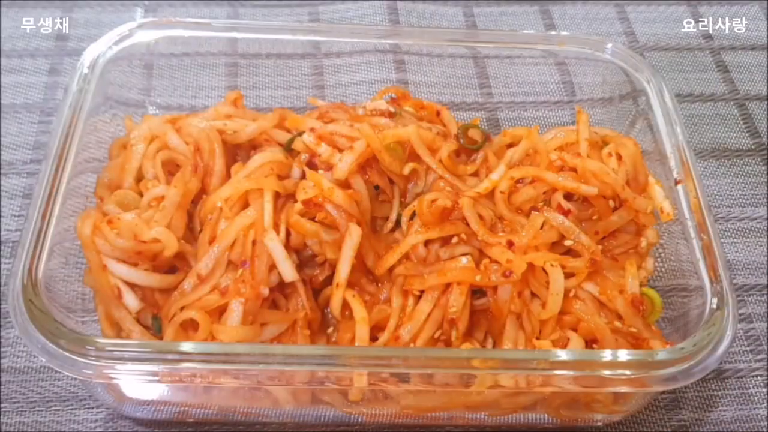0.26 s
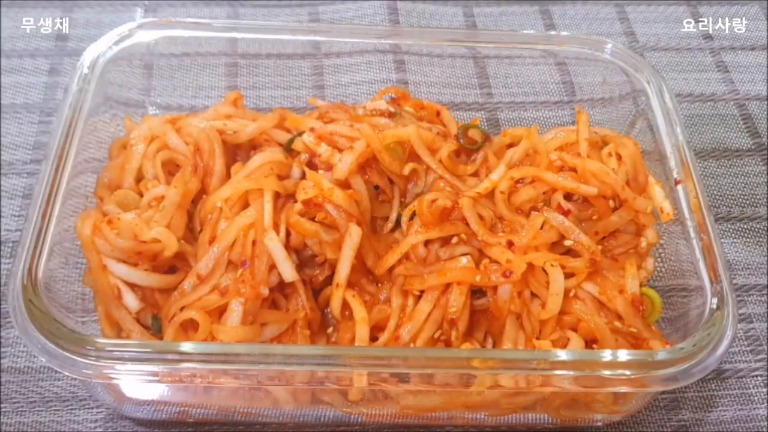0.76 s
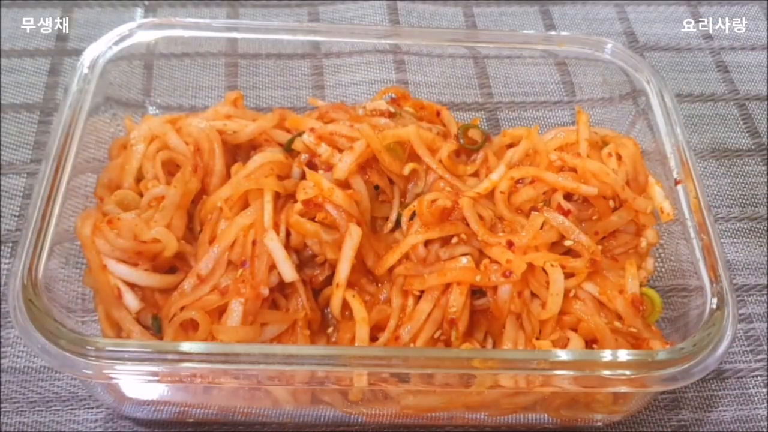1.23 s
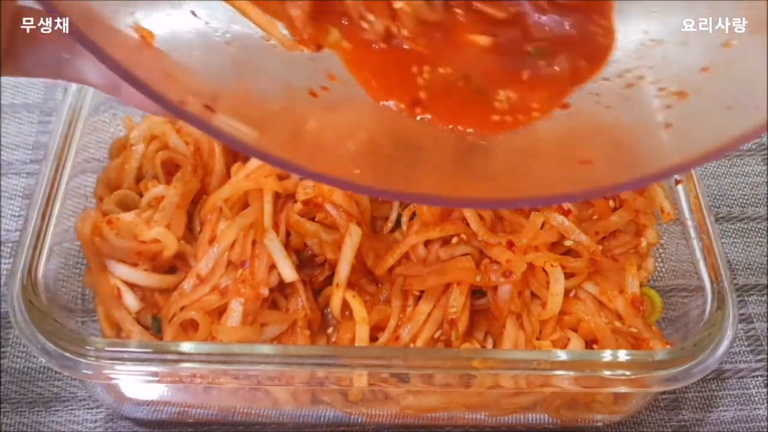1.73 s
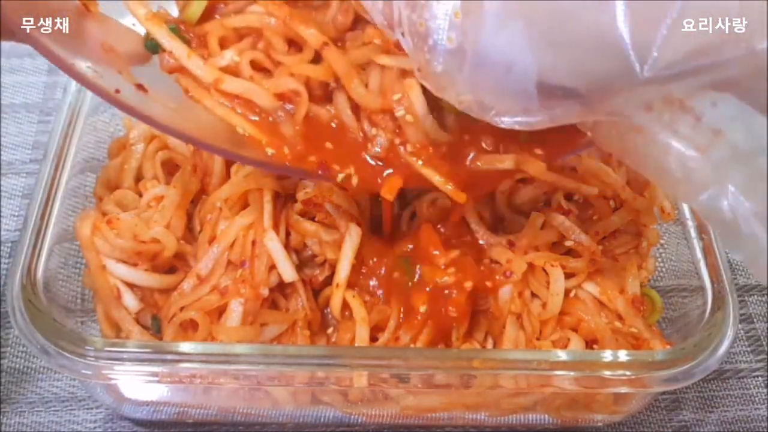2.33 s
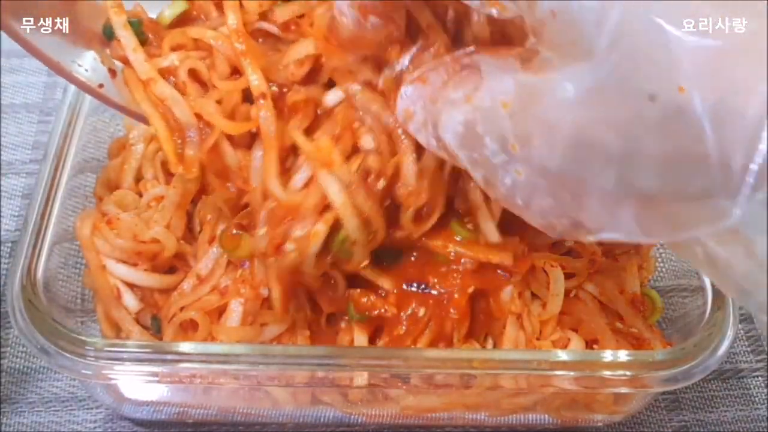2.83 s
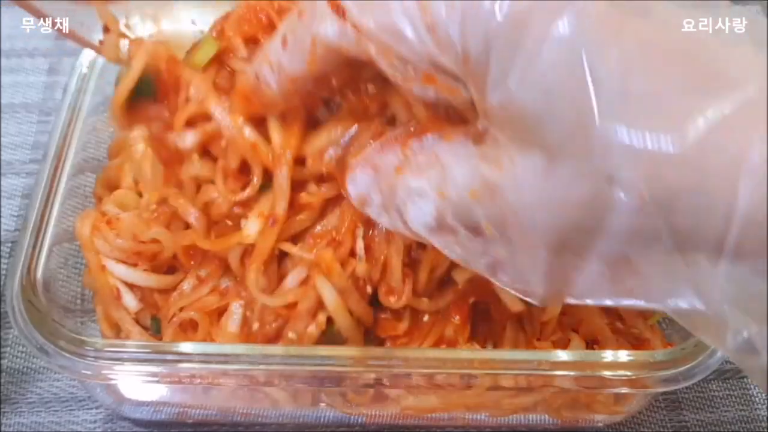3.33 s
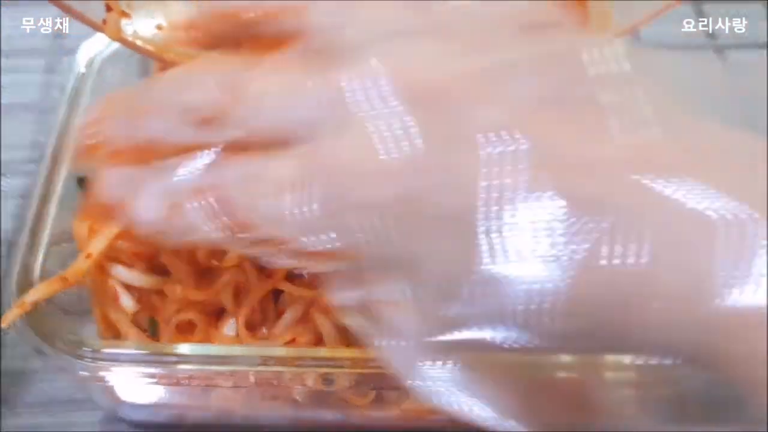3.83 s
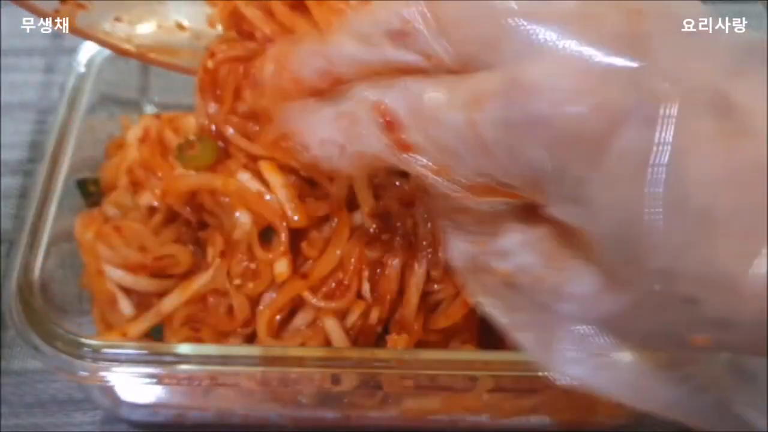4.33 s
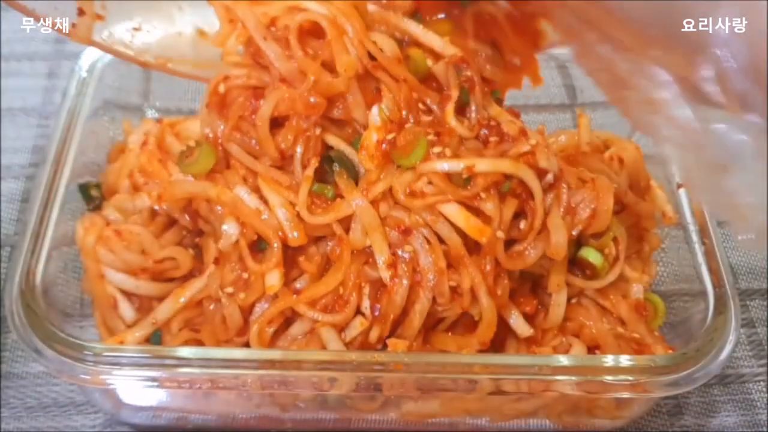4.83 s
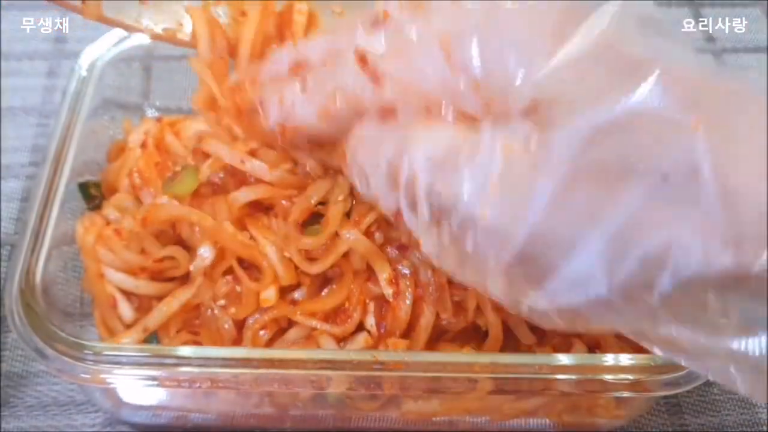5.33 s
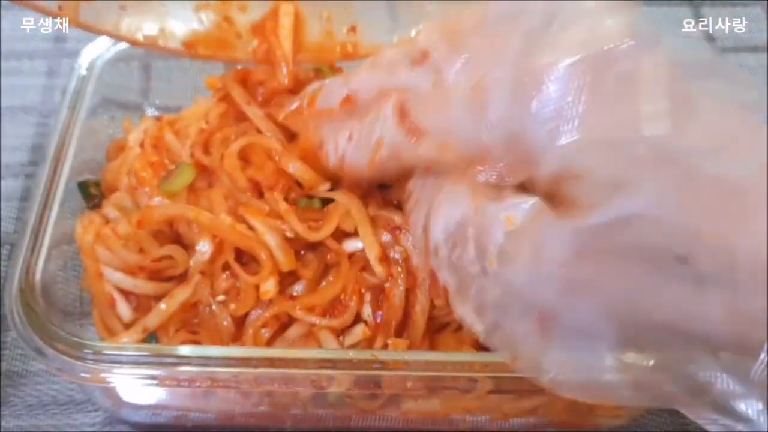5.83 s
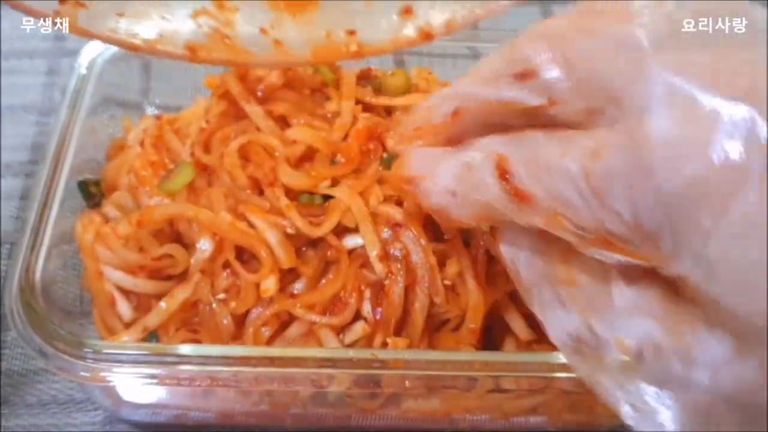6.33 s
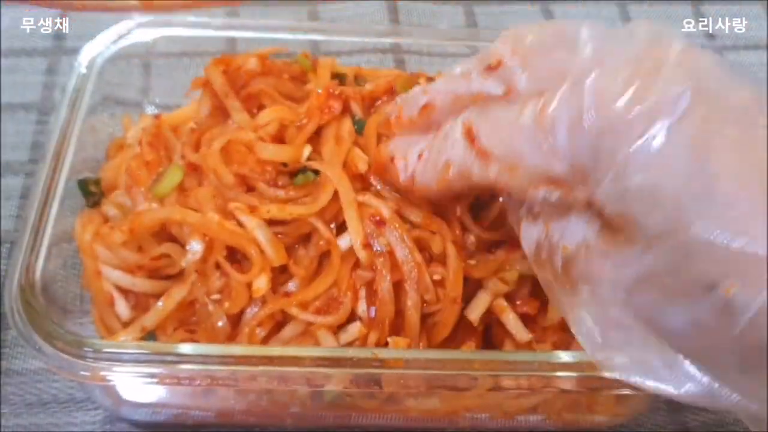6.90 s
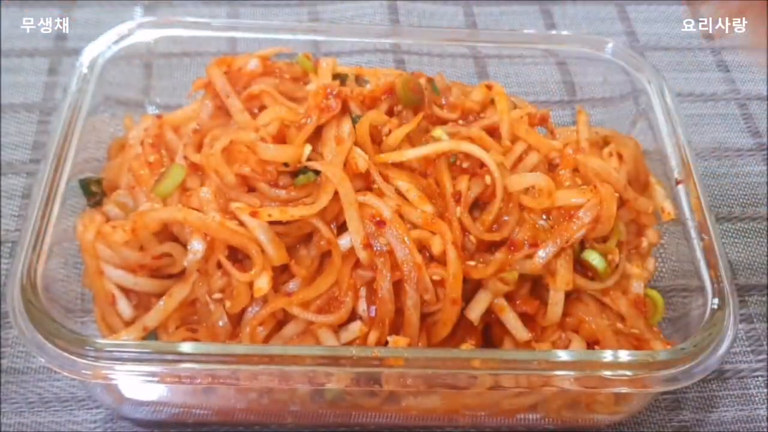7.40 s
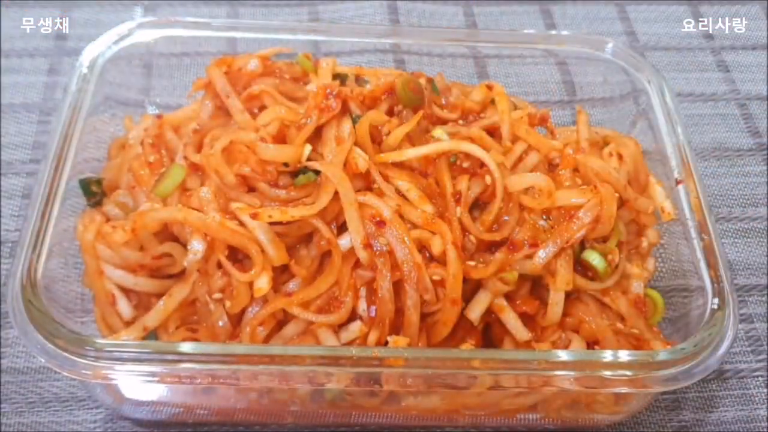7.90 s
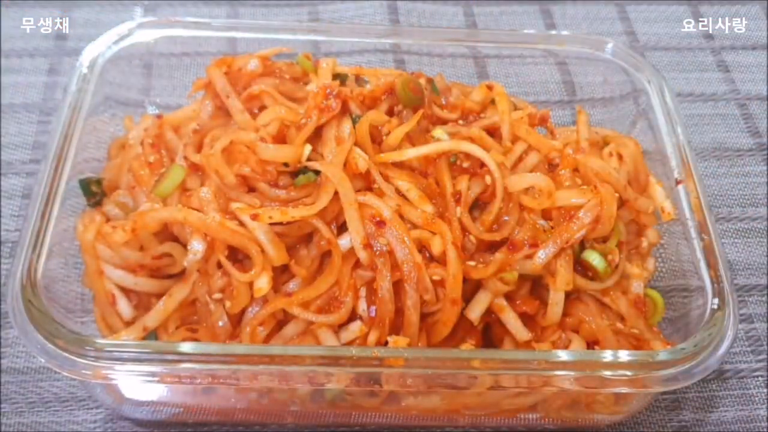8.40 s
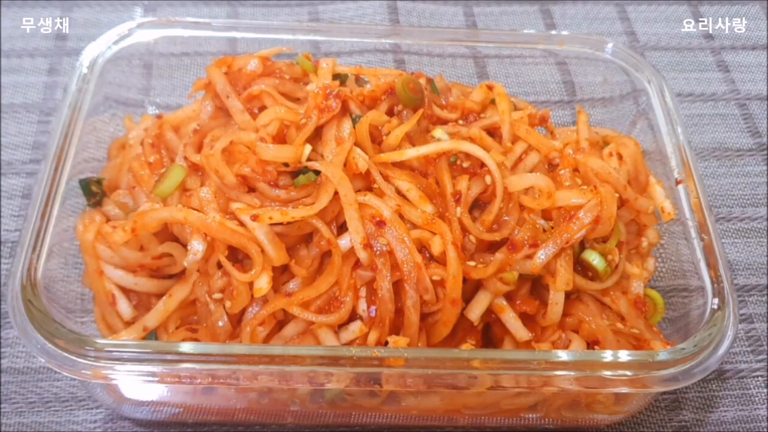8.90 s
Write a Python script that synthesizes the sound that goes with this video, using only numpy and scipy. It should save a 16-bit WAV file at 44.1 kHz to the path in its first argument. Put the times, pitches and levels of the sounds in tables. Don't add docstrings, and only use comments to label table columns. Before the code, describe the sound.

Close stereo pickup in a small hard-walled kitchen, with quiet fridge hum, airy fan hiss and faint far traffic rumble. From 0 to 1 s there are only faint dull scuffs and taps on a held bowl. From about 1 s thin plastic film starts to crackle in short bright snaps, with wet shreds sliding and muffled bowl taps around 2 to 3.3 s; one sharp snap stands out near 2.6 s. From 3.7 to 5.4 s the glove presses and crinkles densely, strongest near 4.8 s, with rising wet pops around 4.9 to 5.1 s. Sparser snaps continue to 6.7 s, with another squelch near 6 s, then small rustles to 7.6 s. The bowl hits the counter with loud hollow knocks at 7.95 and 8.08 s, settling faintly. A slight crinkle at 8.4 s and tiny pop at 8.7 s precede quiet room tone.

```python
import sys
import numpy as np
from scipy import signal
from scipy.io import wavfile

SR = 44100
rng = np.random.default_rng(int(sys.argv[2]) if len(sys.argv) > 2 else 0)


def boost(x):
    u = np.asarray(x, float) / 20
    return 10 ** u


def log_audio(samples):
    frames = np.atleast_2d(samples).T
    limited = np.clip(frames, -1, 1)
    pcm = np.round(limited * 32767).astype(np.int16)
    wavfile.write(sys.argv[1], SR, pcm)


N = 403756

# (time [s], peak level [dB], favoured mode [Hz])
TAPS = [(0.18, -64, 685), (0.712, -60, 660), (1.048, -62, 607), (1.21, -58, 611), (1.34, -67, 703),
        (1.918, -51.5, 400), (1.972, -58, 694), (2.146, -41.5, 795), (2.182, -64, 689), (2.216, -49, 540),
        (2.234, -50, 830), (2.31, -60, 802), (2.402, -57, 685), (2.489, -61, 680), (2.509, -58, 850),
        (2.583, -54, 840), (2.729, -60, 700), (2.797, -55, 720), (2.892, -59, 759), (2.953, -50.5, 584),
        (3.104, -53, 880), (3.308, -52.5, 850), (3.349, -57, 656), (3.825, -54.5, 790), (4.92, -58, 759),
        (6.199, -58, 786)]
EDGES = 22 * 2 ** np.arange(0, 9.6, .5)


def rms_one(x):
    return x / np.sqrt(np.mean(x ** 2) + 1e-20)


def in_time(rows):
    s, *columns = np.transpose(rows)
    return [np.interp(np.arange(N) / SR, s, c) for c in columns]


def at_hz(points, hz):
    table_hz, values = np.transpose(points)
    return np.interp(np.log(hz), np.log(table_hz), values)


def sides(pan_db):
    return boost(np.multiply.outer([.5, -.5], pan_db))


def pair(white, alike):
    alike = np.clip(alike, -1, 1)
    common = np.sqrt(1 + alike) * white[0]
    opposed = np.sqrt(1 - alike) * white[1] * [[1], [-1]]
    return (common + opposed) / np.sqrt(2)


def bands(size=N):
    white = rng.standard_normal((2, 2, size))
    for k, (low, high) in enumerate(zip(EDGES, EDGES[1:])):
        band = signal.butter(2, [low, high], "band", fs=SR, output="sos")
        yield np.sqrt(low * high), signal.sosfilt(band, white[k % 2])


def narrow(white, hz, width_hz):
    r = np.exp(-np.pi * width_hz / SR)
    stage = [1, 0, -1, 1, -2 * r * np.cos(2 * np.pi * hz / SR), r * r]
    return rms_one(signal.sosfilt([stage, stage], white))


def burst(powers, rise_s, fall_s):
    for tau in (rise_s, fall_s):
        decay = np.exp(-2 / (max(tau, 1e-4) * SR))
        powers = signal.lfilter([1], [1, -decay], powers + 1e-18)
    return np.sqrt(powers / (rise_s * SR / 2 + 1))


def swells(s, hold_s, db, rise_db, fall_db):
    clock = np.arange(0, N + 64, 64) / SR
    s, end = np.c_[s], np.c_[np.add(s, hold_s)]
    before, after = np.maximum(s - clock, 0), np.maximum(clock - end, 0)
    level = np.c_[db] - rise_db * before - fall_db * after
    return np.interp(np.arange(N) / SR, clock, boost(2 * level).sum(axis=0))


def hand():
    # (time [s], film crackle [dB], wet strands over crackle [dB])
    work = [(0, -85.5, 3), (.36, -83, 4.5), (.75, -70, 4), (1.25, -68.5, 2), (1.8, -71.5, 3.5),
            (2.3, -69.5, 2.5), (2.8, -67.5, 3.5), (3.3, -61, 0), (3.54, -72, 2), (4.0, -60, -2.5),
            (4.56, -91, -1), (5.0, -62, 1), (5.45, -67.5, -0.5), (6.08, -67.5, 2), (6.36, -83, 5),
            (6.77, -68, -2), (7.3, -82, 6.5), (9.15, -86.5, 2)]
    # (time [s], hold [s], crackle [dB], wet strands over crackle [dB])
    grabs = [(0.198, 0.019, -81, 11.5), (1.042, 0.023, -66.5, 3.5), (1.292, 0.014, -62, 1),
             (1.355, 0.036, -63, -2), (1.865, 0.043, -64, -6), (1.94, 0.038, -62, 1.5),
             (2.05, 0.0091, -65, 3.5), (2.425, 0.088, -63, 2.5), (2.583, 0.011, -57.5, -6),
             (2.89, .06, -64.5, -8), (3.101, 0.08, -53.5, -1), (3.443, .01, -61.5, -2),
             (3.675, 0.023, -58.5, -1), (3.826, 0.05, -59, 0.5), (4.085, 0.057, -60, -1),
             (4.243, 0.19, -62, -1.5), (4.47, 0.018, -56.5, -2.5), (4.6, 0.07, -59.5, 0.5),
             (4.705, 0.1, -55.5, 0), (4.858, 0.09, -56, -2), (5.048, 0.031, -59.5, -2),
             (5.632, 0.017, -58.5, -4), (5.72, 0.011, -63, -15), (5.952, 0.019, -59, -4.5),
             (6.2, .015, -60.5, -0.5), (6.291, 0.017, -62.5, 0), (6.412, 0.17, -58.5, -2.5),
             (7.037, .02, -66, -3.5), (7.153, 0.011, -65.5, -3), (8.434, 0.053, -71, 2)]
    # (time [s], level over wet strands [dB])
    bowl_load = [(0, 3), (.6, 6.5), (.9, -3.5), (1.6, 1), (2.1, -1.5), (3.1, -4.5), (4, -3.5), (6.6, -2),
                 (7.8, 4)]
    grab_rise_db_per_s, grab_fall_db_per_s = 326, 224
    steady_db, damp_db = in_time(work)
    s, hold_s, db, wet_db = np.transpose(grabs)
    crackle = boost(2 * steady_db) + swells(s, hold_s, db, grab_rise_db_per_s, grab_fall_db_per_s)
    wet = boost(2 * (steady_db + damp_db))
    wet = wet + swells(s, hold_s, db + wet_db, grab_rise_db_per_s, grab_fall_db_per_s)
    s, db, _ = np.transpose(TAPS)
    scuffs = swells(s, hold_s=0.0039, db=db - 8, rise_db=900, fall_db=406)
    rub = wet * boost(2 * in_time(bowl_load)[0]) + scuffs
    return 10 * np.log10([crackle, wet / crackle, rub])


def glove(crackle_db, wet_db):
    # (time [s], peak level
    # [dB], dull part over peak [dB], bright part over peak [dB])
    film_snaps = [(1.172, -39.5, -23, -20), (1.3004, -37, -14, -3), (1.318, -43, -28, 5),
                  (1.3598, -28.5, -23, -26), (1.4068, -36.5, -16, -14), (1.5304, -43.5, -15, -16),
                  (1.677, -41, -14.5, -17), (1.8265, -36, -25, -11), (1.8522, -36.5, -22, -8),
                  (1.941, -35, -29, -10), (1.968, -31, -26, -15), (2.0524, -33.5, -12.5, -11),
                  (2.145, -37, -14, -12), (2.2176, -39, -10, -12), (2.314, -43.5, -8, -11),
                  (2.4795, -38, -14, -13), (2.5829, -19.5, -38, -23), (2.7058, -38, -13, -1),
                  (2.7855, -35.5, -34, -24), (2.8812, -38, -25, -3), (2.9374, -34.5, -21, -3.5),
                  (3.018, -32, -41, -10.5), (3.0666, -35.5, -15, -7), (3.0792, -30, -30, -8),
                  (3.1665, -33, -27, -3), (3.2662, -38, -13, -6), (3.355, -36.5, -24, -1),
                  (3.4304, -38, -25, -6), (3.518, -42, -32, -7), (3.5627, -35.5, -18, -15),
                  (3.6801, -40, -19, -7), (3.8158, -29.5, -21, -11), (3.841, -34.5, -16, -1),
                   (3.93, -34.5, -15, -6.5), (4.064, -30.5, -22.5, -6), (4.1294, -32.5, -17, -21),
                   (4.255, -33.5, -30, -22), (4.2772, -35, -15, -10), (4.4618, -33, -32, -15),
                   (4.482, -39, -26, 0), (4.674, -37, -30, -6), (4.813, -24.5, -25, -7),
                   (4.922, -31.5, -12, 0), (5.036, -35, -22, -12), (5.256, -37, -22, -5.5),
                   (5.363, -30.5, -27, -13), (5.6541, -27, -39, -17), (5.716, -32.5, -20, -10),
                   (5.8174, -27.5, -35, -14), (5.905, -40.5, -35, -8), (5.9875, -27.5, -36, -11),
                   (6.1994, -39, -19, -5), (6.4657, -36.5, -33, -5), (6.551, -26.5, -44, -15),
                   (6.6514, -32.5, -40, -10.5), (6.697, -45, -36, -5), (7.143, -51, -11, -4),
                   (7.5692, -50.5, -16, -12), (8.4385, -39, -13.5, -18), (8.464, -36, -25, -42)]
    # (frequency [Hz], density [dB per Hz])
    film = [(530, -58), (900, 3.5), (1230, -4.5), (1970, 2), (3070, -1), (4200, -2), (8760, -5),
            (15100, -4.5), (16000, -28)]
    # (frequency [Hz], left-right level [dB])
    film_pan = [(800, 2), (2000, 0.5), (8000, 3.5), (15000, 1)]
    when, size, dull, bright = rng.random((4, 3600))
    at = (when * N).astype(int)
    size_db = 17.5 - 2.57 * np.log(np.maximum(size, .04))
    swarm_db = 1.29 * crackle_db[at] + size_db
    s, peak_db, dull_db, bright_db = np.transpose(film_snaps)
    level_db = np.r_[swarm_db, peak_db - 10]
    dull_db = np.r_[wet_db[at] - 16 * dull + 4, dull_db + 14]
    bright_db = np.r_[4 - 14 * bright, bright_db + 10]
    at = np.r_[at, (s * SR).astype(int)]
    gains = sides(rng.normal(0, 0.89, len(at)))
    total = sum(boost(2 * at_hz(film, hz)) * hz * .347 for hz in EDGES if hz > 3500) / (SR / 2)
    out = np.zeros((2, N))
    for hz, white in bands():
        if hz < 700:
            continue
        low = np.clip(np.log2(4500 / hz), 0, 1)
        high = np.clip(np.log2(hz / 5500), 0, 1)
        tint_db = rng.normal(-1.56, 3.0, len(at))
        crease_db = level_db + low * dull_db + high * bright_db + tint_db
        powers = np.zeros((2, N))
        np.add.at(powers, (slice(None), at), (gains * boost(crease_db)) ** 2)
        shape = burst(powers, rise_s=0.00045, fall_s=0.0019 + 3.5 / hz)
        shape = shape + boost(crackle_db + low * wet_db - 10.0)
        out += boost(at_hz(film, hz)) * sides([at_hz(film_pan, hz)]) * pair(white, 180 / hz) * shape
    return out / np.sqrt(total)


def ticks():
    # (time [s], peak
    # level [dB], dull part over peak [dB], bright part over peak [dB])
    film_ticks = [(0.9758, -55, -9, 0), (1.0316, -52, -6, -4), (1.2436, -49, 3, 0), (1.2645, -50, -6, -2),
                  (1.3682, -38, -9, 0), (1.4324, -43.5, -10, 0), (1.834, -40, -6, 0), (1.9348, -41, -6, 0),
                  (2.0342, -44, -6, -2), (2.1094, -47, -6, 1), (2.4668, -43, -1, -2), (2.5658, -39, 3, -5),
                  (2.6364, -42, -6, 3), (2.6927, -45.5, -4, -5), (2.8507, -44, -6, 5), (2.868, -44, -9, 0),
                  (2.8913, -43, -6, 2), (2.9138, -39, -4, -2), (3.103, -40, -6, -2), (3.2176, -39, -6, 1),
                  (3.3326, -40, -5, 0), (3.4512, -41.5, -8, 4), (3.6391, -44, -8, 1), (3.748, -43, -11, 0),
                  (3.7748, -44, -6, 1), (3.905, -41, 0, 1), (4.0115, -44, -8, 5), (4.0274, -51, -6, 0),
                  (4.0492, -41, -4, -2), (4.0716, -39, -4, 2), (4.1121, -41, -6, 0), (4.128, -44, -2, -2),
                  (4.1649, -43, -4, 5), (4.2238, -45, -6, 0), (4.2404, -41, 2, -2),
                  (4.3082, -40.5, -13, 6), (4.3274, -41, -8, 2), (4.3495, -49, -6, 0), (4.362, -36, -3, 0),
                   (4.3742, -33.5, -10, -1), (4.5246, -42, -6, 8), (4.6508, -39.5, -4, 5),
                   (4.6927, -45, -6, 0), (4.7164, -36.5, 0, 0), (4.7274, -36.5, -4, 5),
                   (4.7731, -38, -6, 4), (4.795, -32.5, -9, 4), (4.8414, -39, -8, 3), (4.8623, -39, -6, 0),
                   (4.8878, -40, -6, 2), (4.8978, -36, -11, 6), (4.956, -37.5, -6, 2),
                   (5.0928, -44, -4, -3), (5.1163, -42.5, -2, 4), (5.441, -48, -8, 0),
                   (5.518, -46.5, -8, 2), (5.5523, -49, -6, 4), (5.6095, -49, -9, 7),
                   (5.634, -38.5, -11, 7), (5.7324, -37, -6, 5), (5.8, -47, -9, -4), (5.8596, -42, -8, 0),
                   (5.9462, -38, -6, 2), (5.9748, -37.5, -5, 1), (6.0636, -47, -6, -4),
                   (6.0938, -41, -4, -3), (6.1684, -53, -8, -3), (6.3829, -51, -6, 2),
                   (6.4083, -42, -4, -4), (6.4323, -52, -6, 0), (6.5844, -52, -4, -3), (6.747, -48, -8, 8),
                   (7.0499, -47, -4, 0), (7.4909, -65, -6, 5), (8.4103, -59, 0, 0)]
    # (from [Hz], to [Hz], fall [s])
    tick_parts = [(1510, 3200, 0.0058), (3480, 7800, 0.0019), (8000, 21000, 0.0019)]
    s, peak_db, dull_db, bright_db = np.transpose(film_ticks)
    out = np.zeros((2, N))
    for (low, high, fall_s), part_db in zip(tick_parts, (dull_db - 7, 0 * s, bright_db)):
        powers = np.zeros(N)
        powers[(s * SR).astype(int)] = boost(2 * (peak_db + part_db - 8.5))
        band = signal.butter(2, [low, high], "band", fs=SR, output="sos")
        white = signal.sosfilt(band, rng.standard_normal((2, N)))
        out += pair(rms_one(white), 0.13) * burst(powers, rise_s=0.00022, fall_s=fall_s)
    return out * sides([2.5])


def sauce(wet_level_db):
    # (time [s], peak level [dB], frequency [Hz])
    squelches = [
        (.199, -59, 1590),
        (1.049, -44, 1530),
        (4.722, -40, 1620),
        (4.934, -31, 2270),
        (5.005, -36, 2050),
        (5.115, -37, 2100),
        (5.976, -31.5, 2020),
        (7.157, -42, 1870),
        (7.572, -50, 2750),
        (8.688, -43, 2630),
    ]
    when, size, pitch, place = rng.random((4, 1400))
    s, peak_db, listed_hz = np.transpose(squelches)
    at = np.r_[when * (N - 1000), s * SR].astype(int)
    random_db = wet_level_db[at[:len(when)]] - 4 - 3.0 * np.log(np.maximum(size, .03))
    level = boost(np.r_[random_db, peak_db - 1.5])
    hz = np.r_[1300 * 3.5 ** pitch ** 1.4, listed_hz][:, None]
    age = np.arange(900) / SR
    cycles = hz * age * (1 + 2.8 * age)
    envelope = boost(-3.5 * cycles) * (1 - np.exp(-cycles / 0.76))
    pops = level[:, None] * np.sin(2 * np.pi * cycles) * envelope
    out = np.zeros((2, N))
    turn = np.r_[place, np.full(len(s), .5)]
    for side, lag in zip(out, (0 * turn, 14 * turn)):
        np.add.at(side, (at + lag.astype(int))[:, None] + np.arange(900), pops)
    return out * sides([2.5])


def held_bowl(rub_db):
    # (frequency [Hz], level [dB], t60 [s])
    held_modes = [(360, 5, 0.018), (410, 4.5, 0.029), (565, 5.5, 0.017), (685, 7.5, 0.023),
                  (793.3, -6.5, 0.15), (840, -16, 0.12)]
    force = boost(rub_db - 30.5) * rng.standard_normal((2, N))
    s, peak_db, spot_hz = np.transpose(TAPS)
    out = np.zeros((2, N))
    for hz, db, t60 in held_modes:
        push = pair(force, 0.53)
        off_spot_db = np.minimum(24 * np.abs(np.log2(hz / spot_hz)), 9)
        push[:, (s * SR).astype(int)] += boost(peak_db - 1.5 - off_spot_db)
        r, w = boost(-60 / (t60 * SR)), 2 * np.pi * hz / SR
        out += boost(db) * signal.lfilter([0, np.sin(w)], [1, -2 * r * np.cos(w), r * r], push)
    soft = signal.butter(6, 930, fs=SR, output="sos")
    return signal.sosfilt(soft, out)


def strokes():
    # (time [s], hold [s], lower mode level [dB], upper mode level [dB])
    drags = [(.19, .03, -69, -86), (0.467, .14, -71, -80), (0.702, 0.054, -65.5, -80),
             (1.18, 0.072, -66, -80), (1.355, .05, -77, -83), (2.064, 0.022, -62, -75),
             (2.216, .03, -70, -72), (2.32, 0.017, -70, -76), (2.423, .06, -72, -74), (2.49, .03, -67, -61),
             (2.55, 0.05, -76, -66), (2.73, 0.1, -73, -68.5), (2.938, 0.051, -72, -69),
             (3.305, 0.054, -71, -69.5)]
    # (frequency [Hz], width [Hz])
    wall_modes = [(668, 70), (848, 43)]
    s, hold_s, *levels = np.transpose(drags)
    white = rng.standard_normal((2, N))
    out = np.zeros((2, N))
    for (hz, width_hz), db in zip(wall_modes, levels):
        power = swells(s, hold_s, db, rise_db=502, fall_db=350)
        out += np.sqrt(power) * pair(narrow(white, hz, width_hz), 0.6)
    return out


def set_down():
    # (time [s], crack level [dB], ring choked after [s])
    knocks = [
        (7.948, -11, 0.095),
        (8.075, -14, 0.2),
        (8.165, -43, 0.077),
    ]
    bowl_hz = [157, 182, 252, 325, 389, 434, 589, 812, 854, 868, 1069, 1392, 1416, 1630, 2099, 2126, 2365,
               2950, 3110, 4150]
    # (t60 [s], level at first, second and third contact [dB])
    bowl_modes = [(.15, -33, -37.5, -63.5), (0.18, -31.5, -40, -40.5), (0.15, -37.5, -59, -53),
                  (0.077, -23, -33, -63), (0.19, -34.5, -51, -58), (0.13, -27.5, -33.5, -59),
                  (0.064, -29.5, -40.5, -69), (0.17, -31, -30, -46), (0.47, -24, -35, -60),
                  (0.17, -41, -25.5, -62), (0.062, -31.5, -38, -65), (0.21, -48, -33.5, -59),
                  (0.62, -35, -39, -56), (0.056, -46, -32.5, -62), (0.033, -29.5, -20, -62),
                  (0.14, -44, -37.5, -65), (0.034, -39, -42.5, -57), (0.058, -44.5, -35.5, -62),
                  (0.13, -48, -47.5, -70), (0.013, -22, -42.5, -53)]
    # (left-right level [dB], left lead at first contact [rad], at later contacts [rad])
    bowl_sides = [(3, 0.5, 1), (0, .2, 0.7), (1.5, 0.5, 0), (-5.5, 1, -0.3), (5, 1, .1), (1.5, 0.9, 0.5),
                  (-3, 1.2, 2.5), (-7.5, 2.8, -2), (-4.5, 1.7, 3), (-6, 1.6, 3), (-1.5, -1.2, 0.5),
                  (9.5, -3.5, 1.3), (9, -3, 2.3), (3, -1, 1.7), (10.5, 1.4, -1.5), (-2, .7, -.6),
                  (3.5, 1.6, 3), (6, -1, 0.5), (5, 0, -0.5), (8, -1, -1.5)]
    # (frequency [Hz], density [dB per Hz])
    crack_film = [(28, -62), (60, -36), (140, -13.5), (300, -10), (520, -18), (1050, -11.5), (1700, -19.5),
                  (2300, -14.5), (4200, -32), (5800, -29), (9000, -35), (15500, -35)]
    # (frequency [Hz], left-right level [dB])
    crack_pan = [(150, 3.5), (430, 4), (850, -3.5), (1407, 3.5), (2100, 2.5), (4200, 3)]
    ring, crack = np.zeros((2, 2, N))
    start = int(7.9 * SR)
    clock, powers = np.arange(start, N) / SR, np.zeros(N - start)
    for k, (s, crack_db, choke_s) in enumerate(knocks):
        age = np.maximum(clock - s, 0)
        powers[int(s * SR) - start] = boost(2 * crack_db)
        choked_db = -12 * np.clip((age - choke_s + 0.0073) / 0.017, 0, 1)
        for hz, (t60, *hit_db), (pan_db, *leads) in zip(bowl_hz, bowl_modes, bowl_sides):
            lead = np.multiply.outer([.5, -.5], [leads[min(k, 1)]])
            dying = boost(hit_db[k] + choked_db - 60 * age / t60) * (1 - np.exp(-age / 0.0017))
            ring[:, start:] += sides([pan_db]) * dying * np.sin(2 * np.pi * hz * age + lead)
    for hz, white in bands(size=N - start):
        shape = burst(powers, rise_s=0.00015, fall_s=0.0023 + 1.9 / hz)
        noise = pair(white, min(200 / hz, .8)) * sides([at_hz(crack_pan, hz)])
        crack[:, start:] += boost(at_hz(crack_film, hz) + 14.5) * noise * shape
    return ring, crack


def kitchen():
    # (frequency [Hz], t60 [s])
    kitchen_t60 = [(150, 0.24), (1000, 0.42), (3000, 0.39), (6000, 0.36), (14000, 0.28)]
    age = np.arange(SR // 2) / SR
    echo = np.zeros((2, SR // 2))
    for hz, white in bands(size=SR // 2):
        echo += pair(white, min(220 / hz, .8)) * boost(-60 * age / at_hz(kitchen_t60, hz))
    echo = echo * (1 - np.exp(-age / 0.0016))
    return echo / np.sqrt(np.sum(echo ** 2) / 2)


def wavering(hz, wander_hz, steady):
    r = np.exp(-128 * np.pi * wander_hz / SR)
    draw = rng.standard_normal((2, 2, N // 64 + 502))
    slow = signal.lfilter([1], [1, -2 * r, r * r], draw[0] + 1j * draw[1])[:, 500:]
    slow = slow / np.abs(slow) ** np.clip(steady, 0, 1)
    carrier = np.exp(2j * np.pi * hz * np.arange(N) / SR)
    return rms_one((np.repeat(slow, 64, axis=1)[:, :N] * carrier).real)


def background():
    # (frequency [Hz], density [dB per Hz])
    air_spectrum = [(15, -27), (30, -11.5), (100, -5.5), (160, -18), (230, -13.5), (420, -21.5), (590, -21),
                    (800, -23), (1330, -26.5), (1700, -30), (3250, -53.5), (5850, -47.5), (10500, -33),
                    (16000, -43.5)]
    # (frequency [Hz], left-right level [dB])
    air_pan = [(60, 0.9), (400, 1), (2000, 1), (10000, 2)]
    # (frequency [Hz], left-right likeness [-1..1])
    likeness = [(60, 1), (240, 0.398), (950, 0.12), (3770, 0.03), (15000, 0.02)]
    # (frequency [Hz], wander [Hz], level [dB], steadiness [0-1])
    fridge_tones = [(109.5, 3.5, -70, 1), (261, 9, -79, 0.2), (297.4, 6.1, -81, .3), (338, 2.75, -70, 0.02),
                    (367, 3, -67, 0.73)]
    # (frequency [Hz], width [Hz], level [dB], left-right likeness [-1..1])
    fan_hiss = [(316, 97, -70.5, 0.82), (1511, 82, -81.5, 0.1), (10500, 1200, -79.5, 0.054)]
    # (time [s], hold [s], level [dB])
    passes = [
        (0.53, 0.3, -59),
        (1.39, 0.23, -63),
        (2.12, 0.17, -57),
        (2.755, 0.86, -67),
        (4.4, 1, -71.5),
        (9.15, .05, -69.5),
    ]
    air_db, traffic_db = -67.5, -77
    air = np.zeros((2, N))
    for hz, white in bands():
        noise = pair(white, at_hz(likeness, hz))
        air += noise * boost(at_hz(air_spectrum, hz)) * sides([at_hz(air_pan, hz)])
    white = rng.standard_normal((2, N))
    tones = sum(boost(db) * wavering(hz, wander_hz, steady) for hz, wander_hz, db, steady in fridge_tones)
    hum = pair(tones, 0.88)
    fan = sum(boost(db) * pair(narrow(white, hz, width_hz), alike) for hz, width_hz, db, alike in fan_hiss)
    s, hold_s, db = np.transpose(passes)
    traffic = boost(2 * traffic_db) + swells(s - hold_s / 2, hold_s, db, rise_db=106, fall_db=105)
    rumble = np.sqrt(traffic) * pair(narrow(white, hz=77, width_hz=40), 1.0) * sides([2.5])
    return boost(air_db) * rms_one(air) + hum + fan + rumble


def scene():
    crackle_db, wet_db, rub_db = hand()
    near = glove(crackle_db, wet_db) + ticks() + sauce(crackle_db + wet_db)
    near = near + held_bowl(rub_db) + strokes()
    ring, crack = set_down()
    sent = boost(-13) * near + boost(-20.5) * ring + boost(-3.5) * crack
    walls = signal.fftconvolve(sent, kitchen(), axes=1)[:, :N]
    return near + ring + crack + walls + background()


def roll_off(x):
    return signal.sosfilt(signal.butter(12, 16840, fs=SR, output="sos"), x)


def record(dry):
    low_pass = signal.cheby2(12, 40, 16180, fs=SR, output="sos")
    mix = signal.sosfilt(low_pass, dry)
    return roll_off(mix)


dry = scene()
out = record(dry)
log_audio(out)
```